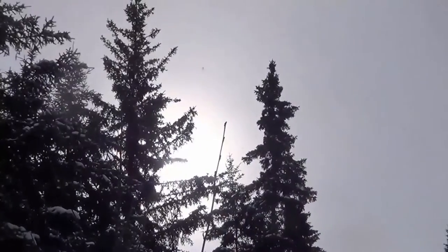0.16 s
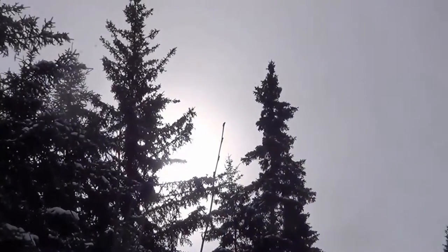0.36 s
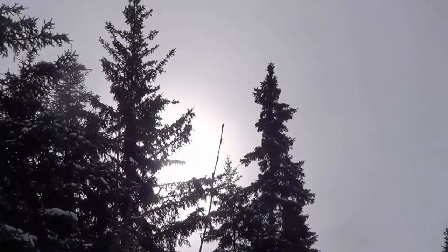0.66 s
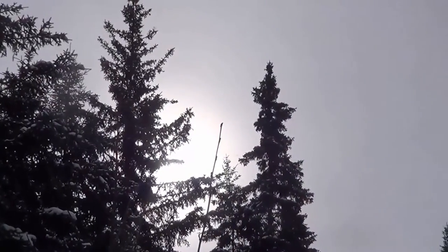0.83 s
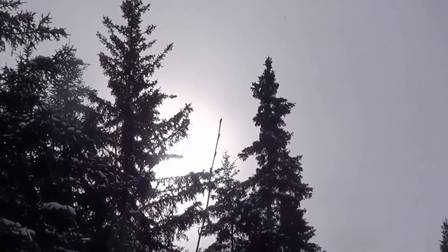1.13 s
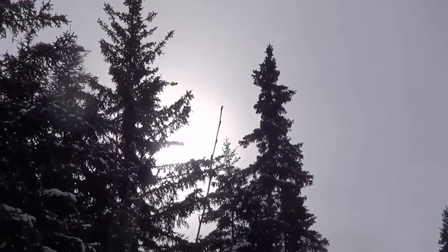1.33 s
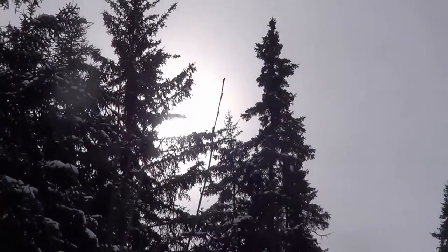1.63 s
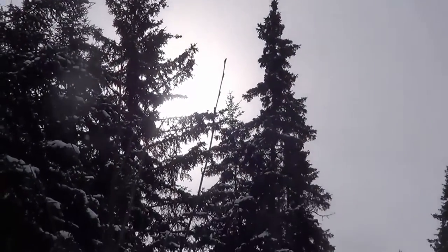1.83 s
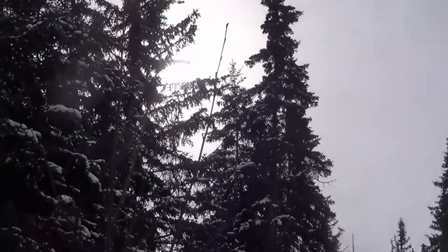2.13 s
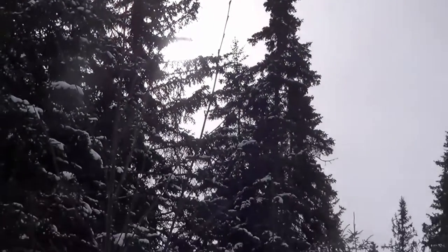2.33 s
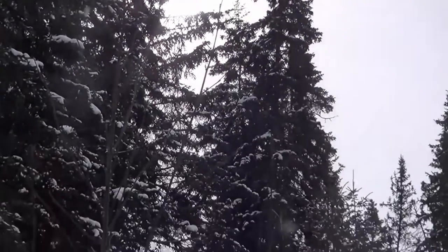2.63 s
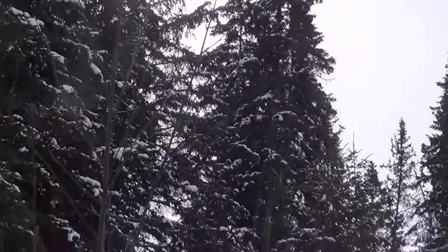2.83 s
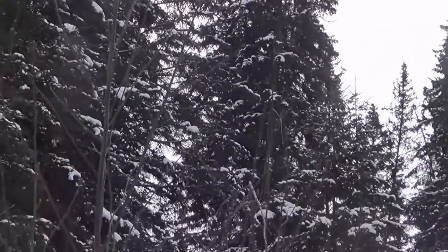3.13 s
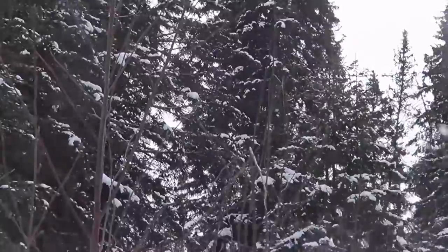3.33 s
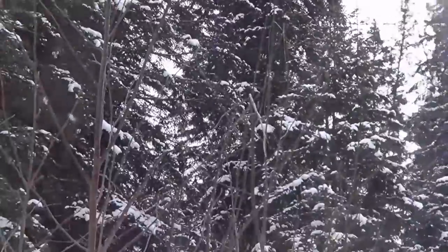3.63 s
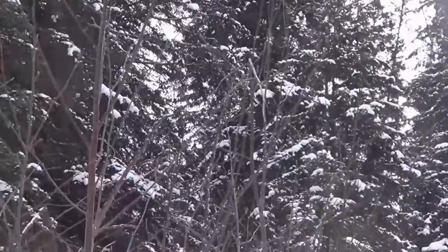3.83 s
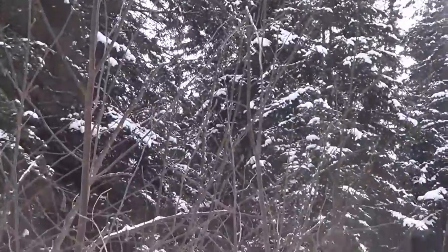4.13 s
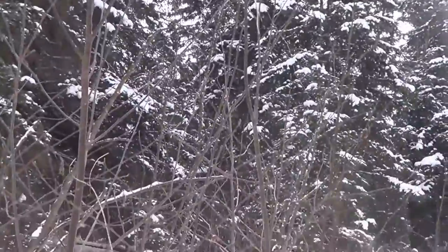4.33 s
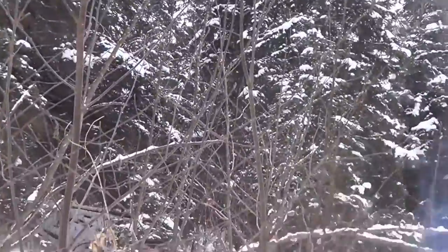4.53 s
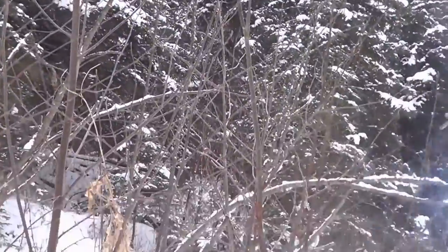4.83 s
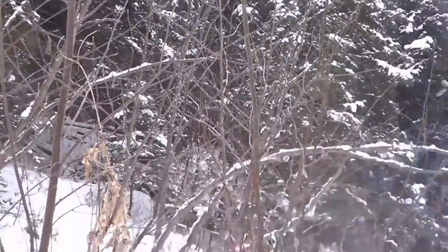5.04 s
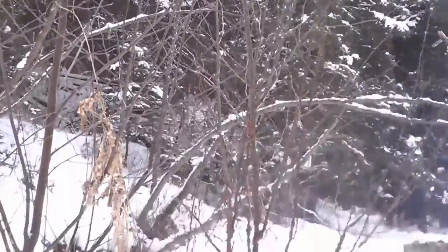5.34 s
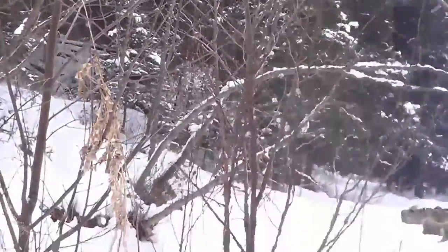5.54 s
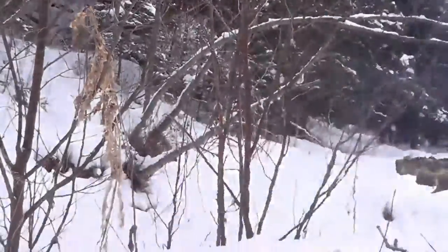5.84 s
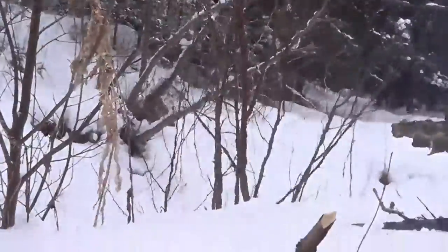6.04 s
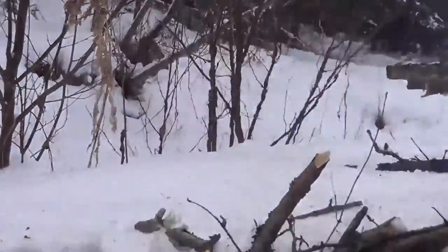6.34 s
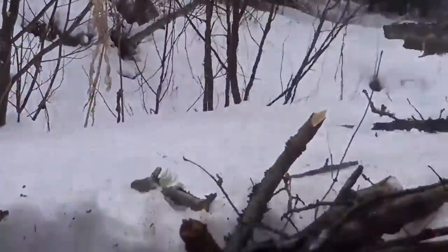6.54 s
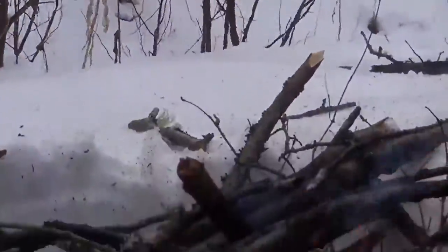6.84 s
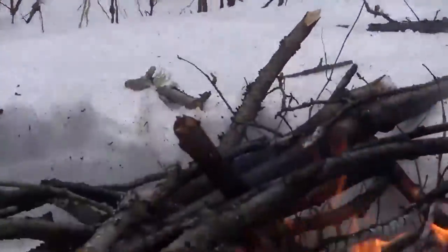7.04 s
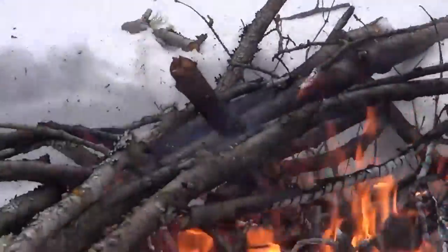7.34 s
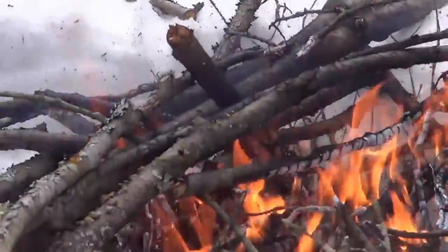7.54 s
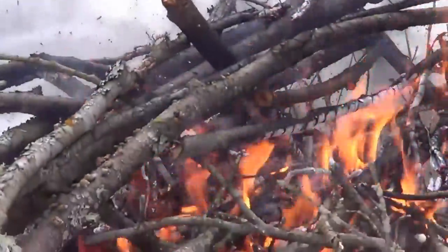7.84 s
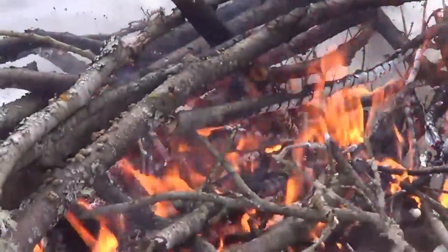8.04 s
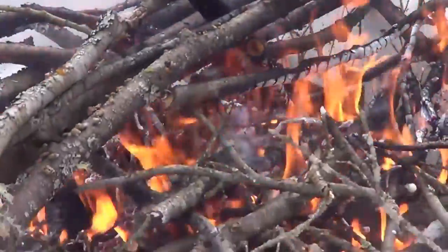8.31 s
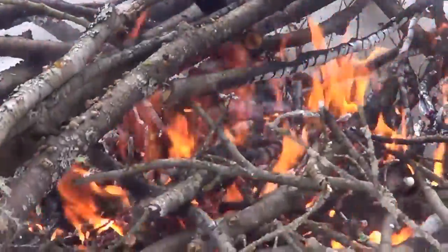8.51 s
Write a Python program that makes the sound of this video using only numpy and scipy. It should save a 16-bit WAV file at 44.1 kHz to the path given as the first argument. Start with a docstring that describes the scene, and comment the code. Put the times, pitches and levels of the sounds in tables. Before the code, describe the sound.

Wet sticks burn outdoors: sharp dry cracks, tiny ticks and occasional low wooden knocks over steady sizzling steam and faint camera whir.

```python
"""Damp campfire in snow

A campfire of damp branches burns a step away in a still, snowy wood, without echoes.
Steam pockets burst the wood: spikes ring its modes as dry pops and ticks; settling sticks knock.
Boiling sap hisses: noise shaped by a wandering jet, wide cracks and fine pores; squirts and flame puffs swell.
Below lie a low rush of air (coloured noise) and a hand-held camera: whir (resonant noise) and whine (sine)."""
import sys
import numpy as np
from scipy import signal
from scipy.fft import rfft, irfft, next_fast_len
from scipy.io import wavfile

SR = 44100
rng = np.random.default_rng(int(sys.argv[2]) if len(sys.argv) > 2 else 0)


def generate_wav(sig):
    """Save sig (samples, or channels by samples) to the path in sys.argv[1] as 16-bit PCM at SR."""
    pcm = np.round(np.clip(np.atleast_2d(sig).T, -1, 1) * 32767).astype(np.int16)
    wavfile.write(sys.argv[1], SR, pcm)


N = 382347
TIME = np.arange(N) / SR
LEFT_RIGHT = np.array([[1], [-1]])

# wood bursts: start_s, mode_width_at_ref_hz, then per mode: mode_hz, level_db (over 1 ms, before pan and low cut)
WOOD_BURSTS = [(0.0566, 3900, 1080, -45.5, 5090, -36.0, 10470, -34.5),
               (0.2477, 1500, 1700, -49, 6000, -32, 7600, -28, 11300, -24),
               (0.2644, 3600, 1620, -40.5, 6510, -38.5),
               (0.4596, 1300, 1910, -32, 3650, -31, 5190, -33.0, 7400, -26, 9800, -19, 13800, -28.5),
               (0.5505, 1300, 2040, -32.0, 4060, -32.5, 5110, -29.0, 6760, -24.5, 9580, -21.0, 12170, -26.5),
               (0.6129, 3600, 1690, -40.0, 7280, -31.5, 13390, -33.0),
               (0.6473, 1000, 7080, -38.5, 9660, -38.5, 11830, -34.5),
               (0.7017, 2100, 810, -47.5, 2220, -34, 8400, -17, 14810, -17), (0.7469, 1800, 10200, -34),
               (1.1385, 2700, 1630, -46.5, 4100, -43.5, 15370, -30.0), (1.406, 1300, 6600, -38),
               (1.4453, 2600, 1540, -43.0, 3930, -37.5, 8940, -36.0),
               (1.5245, 2800, 5660, -38.0, 10720, -38.5), (1.6499, 3700, 2420, -47.5, 11630, -33.0),
               (1.6921, 2500, 2000, -45, 4800, -41),
               (1.7065, 1200, 830, -46.5, 2290, -45.0, 4080, -33.0, 7830, -26.0, 10180, -22.5, 11900, -27.5),
               (1.7469, 3800, 810, -43.0, 3110, -35.0, 9270, -30.5),
               (1.9795, 900, 1870, -45.5, 3790, -48.0, 6160, -37.5, 8930, -38.0, 10720, -26.5, 12640, -38.0),
               (2.0323, 1300, 3850, -41.0, 6230, -44.0, 9360, -28.0, 15320, -37.5),
               (2.0444, 3100, 1590, -43.0, 4800, -44.5, 9960, -29.0),
               (2.0668, 1400, 1970, -47.5, 9720, -30.5, 15130, -32.5),
               (2.0921, 900, 7820, -34.0, 9710, -28.0), (2.16, 1800, 5300, -38.0, 9250, -35.0),
               (2.2468, 800, 2030, -48.0, 6080, -44.5, 8680, -27.0, 14130, -31.5),
               (2.2577, 4000, 1100, -39.5), (2.5623, 1100, 9220, -33.5, 11050, -29.0),
               (2.7237, 600, 8390, -31.5), (2.8133, 2500, 1690, -40.5, 4070, -43.0, 7180, -42.0),
               (2.8403, 1500, 1230, -48.0, 2300, -33, 3630, -28.0, 6700, -24.5, 9600, -20.5, 14300, -22.5),
               (2.908, 2200, 2020, -37.0, 4200, -26, 6600, -23, 8900, -22), (3.1607, 2700, 9160, -32.5),
               (3.1956, 2000, 6760, -34.5, 10100, -28.5),
               (3.2252, 600, 2150, -37, 7880, -27, 9700, -18, 10800, -21),
               (3.5718, 3300, 1940, -47.5, 6110, -30.5), (3.8244, 4000, 1020, -47.0, 4680, -41.0),
               (3.9153, 3900, 1390, -41.5, 3310, -43.0, 8410, -36.5),
               (3.9848, 2100, 2330, -48.0, 5690, -44.0, 8730, -37.5),
               (4.1074, 4900, 3800, -37.0, 10530, -31.0),
               (4.2752, 1300, 2040, -28.5, 4210, -29.0, 5290, -21.0, 7280, -26.5, 9490, -20.0, 13000, -22.0),
               (4.6338, 5400, 2160, -47.5, 8380, -35.5),
               (4.8619, 800, 1750, -30, 3650, -23, 5770, -22.5, 8100, -15.5, 9300, -21),
               (4.9992, 2000, 900, -39, 1500, -35, 2140, -29, 4400, -24.5, 8000, -34, 12450, -35),
               (5.1267, 1900, 7800, -36.0), (5.277, 2100, 1790, -38.0, 3400, -43.0, 7410, -41.0),
               (5.3874, 1300, 1530, -48.0, 3020, -43.0, 4690, -39.0, 8010, -28.5, 9810, -38.5, 13600, -35.0),
               (5.3988, 3700, 980, -47.5, 3870, -42.5, 7650, -30.0),
               (5.4272, 1600, 1500, -33, 3270, -33.5, 5100, -37.5, 6870, -39, 9760, -23),
               (5.5206, 1200, 5520, -45.5, 9990, -33.0, 12120, -31.0),
               (5.5457, 1300, 8990, -39.5, 12580, -37.5, 15370, -34.5),
               (5.6796, 5400, 2270, -41.0, 11960, -26.0), (5.7231, 800, 6720, -35.5),
               (5.7387, 2000, 4190, -44.0, 8290, -30.5, 15370, -40.0), (6.0865, 1300, 3640, -41.5),
               (6.117, 1000, 6750, -35.5, 8680, -38.5, 10410, -38.5),
               (6.2208, 1600, 2270, -36.5, 6700, -18.5, 13870, -20.0), (6.2272, 900, 9500, -28),
               (6.3987, 600, 3400, -29.5, 6530, -21.5, 8500, -20.5, 9000, -20.0, 11840, -23.0),
               (6.4666, 1100, 4030, -46.0, 6340, -40.5, 9330, -38.5), (6.5982, 2200, 6200, -37),
               (6.6034, 1200, 4010, -41, 6500, -33, 9870, -35), (6.6585, 2500, 2600, -44),
               (6.6795, 2200, 1100, -48.0, 2320, -40.5, 4830, -33, 7800, -23.5, 13290, -24.5),
               (6.7011, 1100, 7420, -36.5, 13590, -39.0), (6.7333, 2500, 4700, -41),
               (7.0819, 1200, 6250, -40.0, 9990, -41.5, 13200, -40.5),
               (7.1305, 1500, 3890, -45.5, 6070, -40.0, 9210, -34.5),
               (7.2285, 5400, 8430, -41.5, 12880, -32.5),
               (7.5214, 1800, 2640, -41.5, 4990, -38.5, 11090, -32.0),
               (7.6929, 1300, 3450, -35.5, 5200, -38, 10400, -32),
               (7.7068, 5400, 4030, -40.5, 12050, -39.0), (7.9125, 2500, 4000, -41, 9500, -38),
               (7.9775, 4000, 1300, -41), (8.1368, 4900, 4710, -40.5),
               (8.2492, 3500, 4000, -42, 11000, -34),
               (8.2521, 600, 3400, -33, 5500, -38.0, 7180, -38.0, 9300, -26.5, 10650, -30.5, 13270, -31.5),
               (8.3609, 2300, 2230, -47.5, 4870, -42.0, 11580, -33.5), (8.3828, 3500, 4500, -41),
               (8.4408, 3600, 1610, -42.5, 5030, -37.0, 11550, -32.0), (8.6161, 600, 9500, -30.5)]
WIDTH_REF_HZ = 8000
# settling sticks: start_s, level_db (over 1 ms), pitch_hz, overtone_db (re level_db)
STICK_KNOCKS = [(0.382, -45, 440, -3), (0.566, -37, 235, -27), (0.7022, -45, 450, -6),
                (3.552, -45.5, 509, -9), (4.157, -48, 476, -7), (4.862, -45, 380, -10),
                (5.009, -43, 450, -3), (6.165, -43.5, 466, -9), (6.873, -40.5, 900, -6),
                (6.951, -50.5, 1000, 0), (7.107, -43.5, 900, 4), (7.161, -52, 600, 3),
                (7.1847, -38, 700, -11), (7.648, -46, 820, 2), (7.666, -43.5, 500, -9),
                (7.9111, -46, 950, 11)]
# modes of a heavy branch: mode_hz, start_db (of the decay, before build-up), t60_s
BRANCH_MODES = [(155, -41, 0.13), (255, -41, 0.055), (352, -41, 0.06), (445, -40, 0.065)]
# main steam jet, steady flow: time_s, level_db (before trim)
JET_FLOW = [(0.0, -48.5), (0.26, -50), (0.43, -46.5), (0.72, -52), (1.18, -47), (1.54, -49), (1.83, -48),
            (3.21, -52.5), (3.31, -52.5), (3.79, -54), (4.92, -53), (6.47, -57), (6.62, -55.5),
            (8.67, -51.5)]
# slit of the main jet: time_s, pitch_hz
SLIT_PITCH = [(0, 10160), (3.3, 10100), (4.2, 9400), (6.7, 9600), (7.6, 11200), (8.67, 11300)]
# steam from wide cracks, steady flow: time_s, level_db (before trim)
WIDE_CRACK_FLOW = [(0.0, -55), (2.05, -53.5), (2.58, -55.5), (2.9, -54.5), (3.94, -58.5), (5.05, -56),
                   (6.47, -59), (6.62, -57), (8.67, -61)]
# steam from fine pores, steady flow: time_s, level_db
FINE_PORE_FLOW = [(0.0, -58), (0.34, -55), (1.93, -54.5), (3.09, -59), (3.45, -60), (4.2, -60),
                  (4.59, -58.5), (7.03, -55.5), (8.67, -56)]
# steam colour, wide cracks: freq_hz, density_db (per Hz, relative)
CRACK_SPECTRUM = [(1500, -8.5), (2750, -14), (3700, -7.5), (5000, -4.2), (6300, -0.7), (7800, -1.1),
                  (9500, -1.5), (13000, -27), (16000, -30)]
# steam colour, fine pores: freq_hz, density_db (per Hz, relative)
PORE_SPECTRUM = [(6000, -22), (9500, -6.5), (12000, 1), (13300, 4), (15500, 2.5), (16200, -27),
                 (17000, -40)]
# sap pockets boiling off: peak_s, jet_rise_db, pore_rise_db
SAP_SPURTS = [(0.32, 3.5, 5), (0.57, 3, 1.5), (0.97, 4.5, 2), (1.31, 1, 2), (1.78, 2, 4.5), (2.31, 2.5, 2),
              (2.82, 5, 2), (3.12, 4.5, 2), (4.55, 2, 2), (4.8, 4.5, 1), (6.11, 3, 5), (6.71, 4, 6),
              (7.67, 4, 5), (8.04, 3, -2)]
SPURT_SIGMA_S = 0.054
CRACK_SHARE = 0.38  # share of the jet's rise in dB that reaches the wide cracks
# sap blisters: peak_s, level_db, pitch_hz, sigma_s
SAP_BLISTERS = [(0.03, -40, 7200, 0.008), (4.836, -44, 9200, 0.004), (4.9285, -43, 8200, 0.0015)]
# flame flares: peak_s, level_db, pitch_hz, sigma_s
FLAME_PUFFS = [(0.43, -59, 210, 0.03), (0.89, -61, 80, 0.025), (1.11, -55.5, 175, 0.045),
               (8.42, -61, 330, 0.07)]
# rush of air and flame: freq_hz, density_db (per Hz, relative)
RUSH_SPECTRUM = [(20, -49), (45, -16.5), (90, -4), (170, 0), (280, -3), (430, -3.5), (530, -6.3),
                 (680, -9.2), (1000, -9.5), (1700, -12.5), (2300, -12.5), (2600, -16), (4300, -16.5),
                 (9000, -54)]
# left-right correlation of the diffuse noise: freq_hz, correlation (-1..1)
STEREO_CORRELATION = [(80, .97), (190, .985), (330, .89), (500, .45), (750, -.15), (1300, .05), (2300, .35),
                      (3500, .82), (4500, .65), (6000, .93), (7800, .965), (8600, 1)]
# resonances of the camera case: mode_hz, width_hz, level_db
CASE_MODES = [(2267, 80, -70.7), (1930, 75, -74.3), (3090, 160, -74), (3650, 310, -71.3)]
WHINE_HZ, WHINE_DB = 15734, -62  # mean level; it wavers slightly
CUTOFF_HZ = 16000


def pops(pan_db=0.45, low_cut_ratio=0.55):
    """Each burst rings the modes of the splitting piece; high modes die sooner, little radiates below the lowest."""
    out = np.zeros((2, N))
    for start_s, ref_width_hz, *modes in WOOD_BURSTS:
        push = burst()
        modes = np.reshape(modes, (-1, 2))
        ring = 0
        for mode_hz, level_db in modes:
            width_hz = ref_width_hz * np.sqrt(mode_hz / WIDTH_REF_HZ)
            ring = ring + radiate(push, mode_hz, width_hz, level_db)
        add(out, start_s, cut(ring, low_cut_ratio * modes[0, 0], "high"))
    return out * from_db(pan_db * LEFT_RIGHT)  # left up, right down


def ticks(count=260, top_db=-36.5, range_db=9.0, dull_db=5.5, follow_ratio=0.6,
          low_hz=3500, high_hz=14000, width_hz=2300, low_cut_ratio=0.49):
    """Tiny bursts in bark and needles come at random, louder where sap boils hard; dull ones are softer."""
    out = np.zeros((2, N))
    mean_flow_db = at_time(JET_FLOW, TIME).mean()
    for when, smallness, brightness in rng.random((count, 3)):
        start_s = when * N / SR
        pitch_hz = low_hz + brightness * (high_hz - low_hz)
        boil_db = follow_ratio * (at_time(JET_FLOW, start_s) - mean_flow_db)
        level_db = top_db + boil_db - range_db * np.sqrt(smallness) - dull_db * (1 - brightness)
        ring = radiate(burst(), pitch_hz, width_hz, level_db)
        add(out, start_s, cut(ring, low_cut_ratio * pitch_hz, "high"))
    return out


def burst(near_gain=0.17, near_t60_s=0.0021, pile_gain=0.07, pile_t60_s=0.011,
          wide_gain=0.05, wide_cutoff_hz=8000, size=1024):
    """One pressure spike, scattered at once by the nearest twigs, then more faintly by the whole pile."""
    near, far, side = rng.standard_normal((3, size))
    near_decay = decay(size, near_t60_s)
    pile_decay = decay(size, pile_t60_s)
    mid = near_gain * near * near_decay + pile_gain * far * pile_decay
    mid[0] = rng.choice([-1, 1])
    # scatter arrives from all sides, so left and right differ
    return mid + LEFT_RIGHT * cut(wide_gain * side * pile_decay, wide_cutoff_hz, "low", order=6)


def radiate(push, mode_hz, width_hz, level_db):
    """A piece of wood rings for a few cycles; its whole energy, packed into 1 ms, has the given rms level."""
    ring = resonate(push, mode_hz, width_hz)
    energy = np.sum(ring.mean(axis=0) ** 2)
    return from_db(level_db) * ring * np.sqrt(SR / 1000 / energy)


def knocks(damping_ratio=0.28, overtone_ratio=2.6, high_cut_ratio=3.2, low_cut_ratio=0.6,
           rub_gain=0.35, rub_t60_s=0.026, wide_gain=0.7, wide_cut_hz=500, size=4096):
    """A stick slips, rubs and rings two well-damped bending modes; thick ones ring longer, bark softens contact."""
    out = np.zeros((2, N))
    for start_s, level_db, pitch_hz, overtone_db in STICK_KNOCKS:
        push, side = rub_gain * rng.standard_normal((2, size)) * decay(size, rub_t60_s)
        push[0] = 1  # the slip
        push = push + LEFT_RIGHT * wide_gain * cut(side, wide_cut_hz, "high")
        push = cut(push, high_cut_ratio * pitch_hz, "low")
        push = cut(push, low_cut_ratio * pitch_hz, "high")
        modes = ((pitch_hz, level_db), (overtone_ratio * pitch_hz, level_db + overtone_db))
        for mode_hz, mode_db in modes:
            add(out, start_s, radiate(push, mode_hz, damping_ratio * mode_hz, mode_db))
    return out


def thud(start_s=4.9992, build_up_cycles=1.2, size=8192):
    """The deepest crack sets a heavy branch ringing; its low modes build up last."""
    out = np.zeros((2, N))
    t = TIME[:size]
    for mode_hz, start_db, t60_s in BRANCH_MODES:
        build_up = 1 - np.exp(-mode_hz * t / build_up_cycles)
        swing = from_db(start_db) * decay(size, t60_s) * build_up
        add(out, start_s, swing * np.sin(2 * np.pi * mode_hz * t) * np.ones((2, 1)))
    return out


def steam(jet_trim_db=-0.7, crack_trim_db=2.3, jet_width_hz=4500,
          sputter_db=1.0, sputter_rate_hz=120, flutter_db=1.35, flutter_rate_hz=18):
    """Boiling sap leaves by a jet, wide cracks and fine pores; all swell in spurts and sputter as droplets pass."""
    jet_rise_db, pore_rise_db = spurts()
    jet_db = at_time(JET_FLOW, TIME) + jet_rise_db + jet_trim_db
    crack_db = at_time(WIDE_CRACK_FLOW, TIME) + CRACK_SHARE * jet_rise_db + crack_trim_db
    pore_db = at_time(FINE_PORE_FLOW, TIME) + pore_rise_db
    vents = [(jet(at_time(SLIT_PITCH, TIME), jet_width_hz), jet_db),
             (noise(CRACK_SPECTRUM), crack_db),
             (noise(PORE_SPECTRUM), pore_db)]
    # each vent flutters on its own; the sputter is common
    hiss = sum(sound * from_db(level_db + flutter_db * drift(flutter_rate_hz)) for sound, level_db in vents)
    return hiss * from_db(sputter_db * drift(sputter_rate_hz))


def jet(pitch_hz, width_hz, size=256):
    """Turbulence rings a slit of wandering pitch; the resonance acts twice, so its skirts are steep."""
    out = rng.standard_normal(N)
    state = np.zeros((2, 2))
    r = np.exp(-np.pi * width_hz / SR)
    for i in range(0, N, size):
        slit = [1, 0, -1, 1, -2 * r * np.cos(2 * np.pi * pitch_hz[i] / SR), r * r]
        out[i:i + size], state = signal.sosfilt([slit, slit], out[i:i + size], zi=state)
    return rms_one(out)


def spurts():
    """Sap pockets boil off in smooth swells; returns the rise in dB of the jet and of the pores."""
    peak_s, *rises_db = np.transpose(SAP_SPURTS)
    swells = np.exp(-0.5 * ((TIME - peak_s[:, None]) / SPURT_SIGMA_S) ** 2)
    return np.array(rises_db) @ swells


def squirts():
    """A tiny blister of sap empties with a brief, pitched fizz."""
    return exhale(SAP_BLISTERS, width_hz=1500)


def puffs():
    """Wood gas catches and the flame swells with a low flutter."""
    return exhale(FLAME_PUFFS, width_hz=170)


def exhale(rows, width_hz):
    """Escaping gas: noise through a doubled resonance under a bell-shaped swell."""
    out = np.zeros(N)
    for peak_s, level_db, pitch_hz, sigma_s in rows:
        flow = resonate(rng.standard_normal(N), pitch_hz, width_hz)
        flow = resonate(flow, pitch_hz, width_hz)
        swell = np.exp(-0.5 * ((TIME - peak_s) / sigma_s) ** 2)
        out += rms_one(flow) * from_db(level_db) * swell
    return out


def rush(mean_db=-56.3, waver_db=1.5, waver_rate_hz=9):
    """Soft, steady turbulence of air and flame that wavers slightly."""
    return noise(RUSH_SPECTRUM) * from_db(mean_db + waver_db * drift(waver_rate_hz))


def camera(waver_db=0.5, waver_rate_hz=8):
    """The motor whirs in narrow resonances of the case; the electronics give a thin whine."""
    whir = np.zeros(N)
    for mode_hz, width_hz, level_db in CASE_MODES:
        whir += from_db(level_db) * rms_one(resonate(rng.standard_normal(N), mode_hz, width_hz))
    whine_gain = from_db(WHINE_DB + waver_db * drift(waver_rate_hz))
    return whir + whine_gain * np.sin(2 * np.pi * WHINE_HZ * TIME)


def noise(spectrum):
    """Stereo turbulence of a given colour, rms 1; mid and side are weighted to the left-right correlation."""
    size = next_fast_len(N)
    hz = np.fft.rfftfreq(size, 1 / SR)
    mid, side = rfft(rng.standard_normal((2, size)))
    correlation = np.clip(at_hz(STEREO_CORRELATION, hz), -1, 1)
    stereo = np.sqrt(1 + correlation) * mid + np.sqrt(1 - correlation) * side * LEFT_RIGHT
    coloured = stereo * from_db(at_hz(spectrum, hz))
    return rms_one(irfft(coloured, size)[:, :N])


def drift(rate_hz, step=40):
    """Slow random curve, rms 1: noise through two equal poles at rate_hz, drawn every `step` samples."""
    r = np.exp(-2 * np.pi * rate_hz * step / SR)
    draws = rng.standard_normal(N // step + 2002)
    slow = signal.lfilter([1], [1, -2 * r, r * r], draws)[2000:]  # drop the settling time
    return np.interp(np.arange(N) / step, np.arange(len(slow)), rms_one(slow))


def resonate(x, hz, width_hz):
    """Two-pole resonance with peak gain 1."""
    r = np.exp(-np.pi * width_hz / SR)
    zeros = np.array([1, 0, -1]) * (1 - r * r) / 2
    poles = [1, -2 * r * np.cos(2 * np.pi * hz / SR), r * r]
    return signal.lfilter(zeros, poles, x + 1e-18)  # offset avoids denormals


def cut(x, hz, kind, order=2):
    """Butterworth low- or high-pass."""
    return signal.sosfilt(signal.butter(order, min(hz, SR / 2 - 1), kind, fs=SR, output="sos"), x)


def decay(size, t60_s):
    """Exponential decay from 1, down 60 dB at t60_s."""
    return from_db(-60 * TIME[:size] / t60_s)


def at_time(curve, s):
    """Read a control curve at time s."""
    return np.interp(s, *np.transpose(curve))


def at_hz(points, hz):
    """Read a spectrum on a log-frequency axis."""
    known_hz, values = np.transpose(points)
    return np.interp(np.log(np.maximum(hz, 1)), np.log(known_hz), values)


def from_db(db):
    """Decibels to gain."""
    return 10 ** (np.asarray(db) / 20)


def rms_one(x):
    """Scale to rms 1."""
    return x / np.sqrt(np.mean(x ** 2) + 1e-20)


def add(out, start_s, sound):
    """Mix a short stereo sound in at start_s."""
    start = int(np.clip(round(start_s * SR), 0, N - 1))
    out[:, start:start + sound.shape[1]] += sound[:, :N - start]


def scene():
    """Snow swallows all echoes, so every source arrives dry."""
    fire = pops() + ticks() + knocks() + thud() + steam() + squirts() + puffs()
    return fire + rush() + camera()


def record(dry):
    """Steep elliptic low-pass: 0.1 dB ripple, 80 dB stopband."""
    return signal.sosfilt(signal.ellip(10, 0.1, 80, CUTOFF_HZ, fs=SR, output="sos"), dry)


dry = scene()
out = record(dry)
generate_wav(out)
```